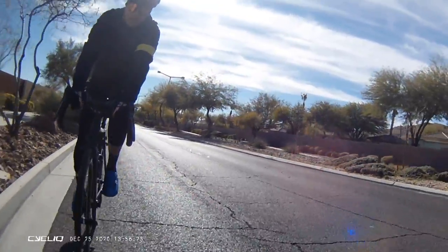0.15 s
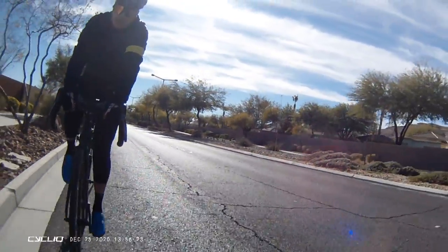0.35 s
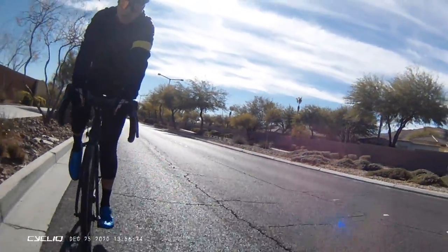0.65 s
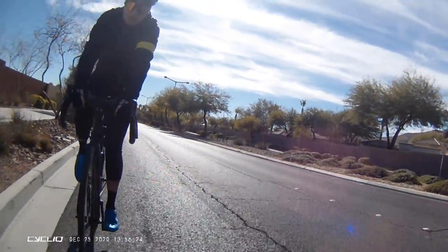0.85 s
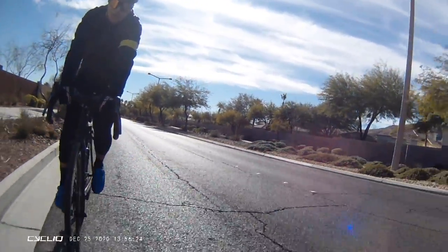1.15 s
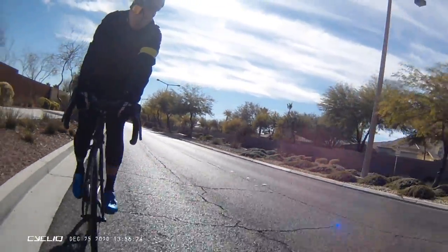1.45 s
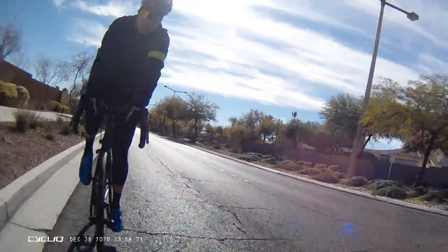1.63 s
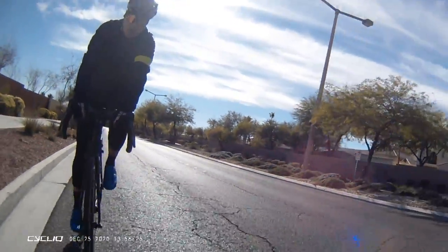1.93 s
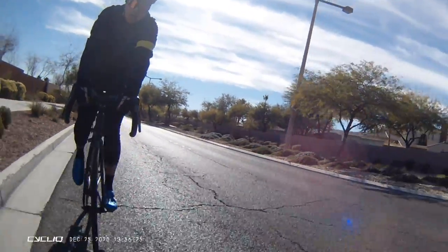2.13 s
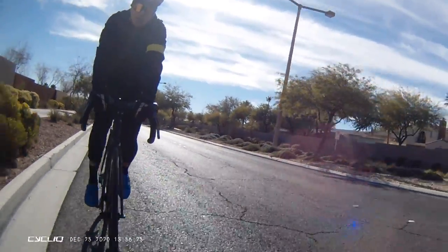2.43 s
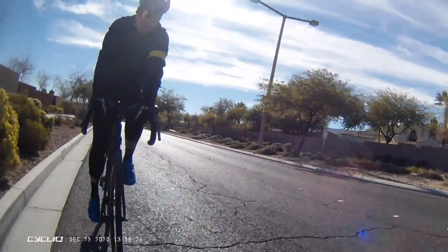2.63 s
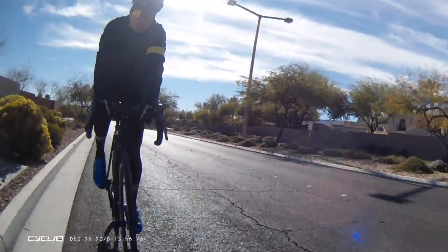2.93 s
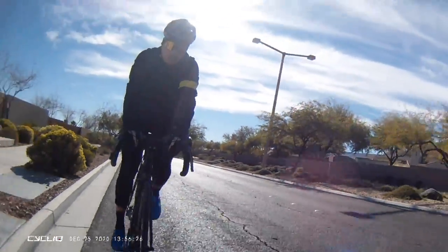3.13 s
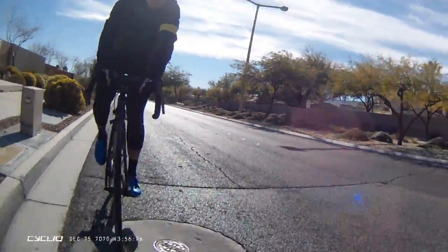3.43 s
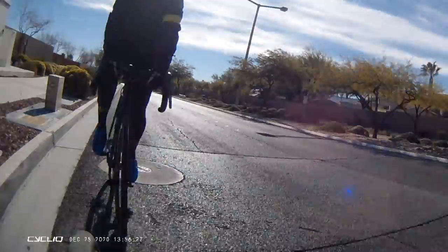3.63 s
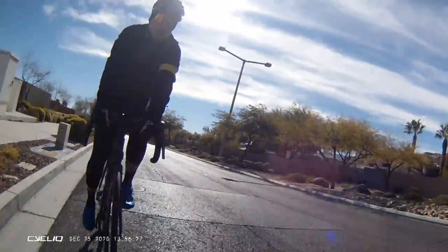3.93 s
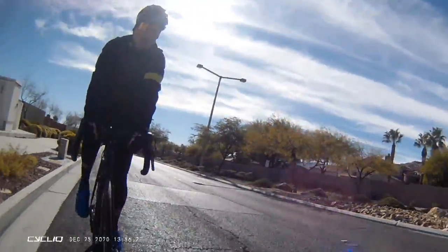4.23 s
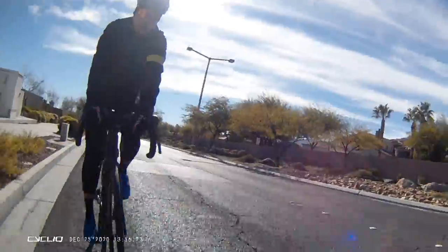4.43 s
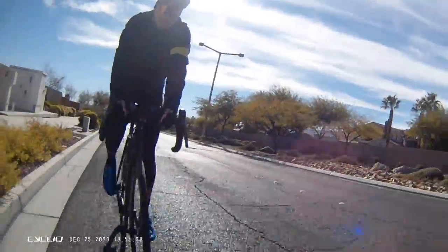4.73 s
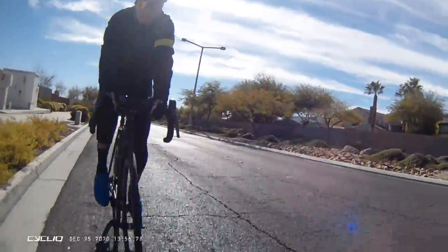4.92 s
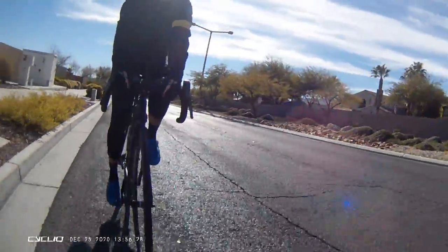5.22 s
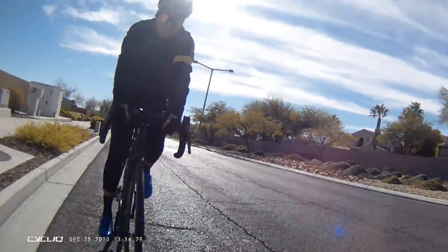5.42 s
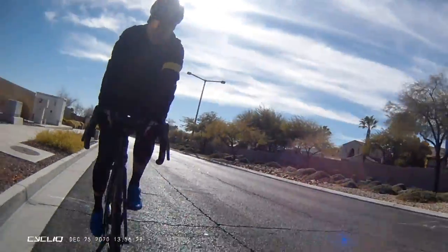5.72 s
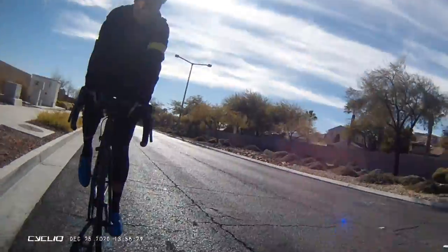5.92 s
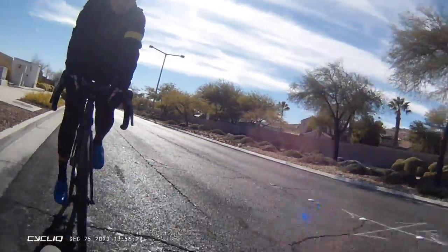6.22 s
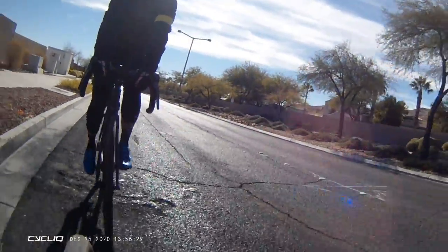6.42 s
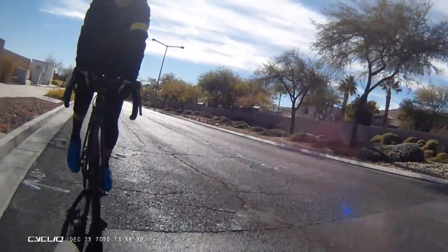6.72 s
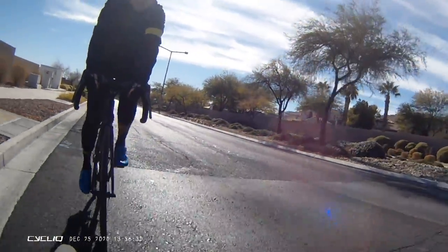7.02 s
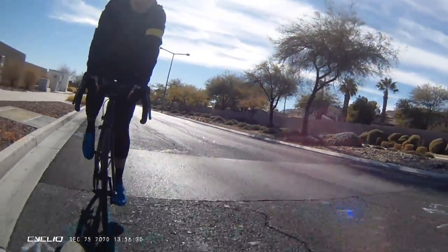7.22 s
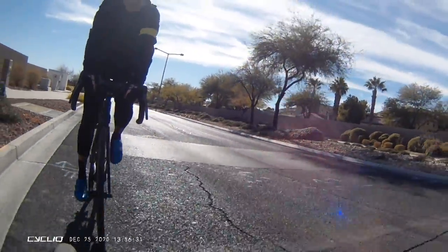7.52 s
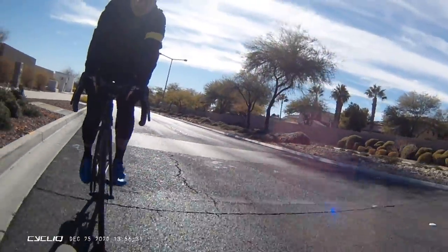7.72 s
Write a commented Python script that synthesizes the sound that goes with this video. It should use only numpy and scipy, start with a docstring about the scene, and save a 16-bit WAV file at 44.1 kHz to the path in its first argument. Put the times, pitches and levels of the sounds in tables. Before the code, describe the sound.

A bicycle rolls along cracked asphalt outdoors, heard very close from inside a plastic housing on the bike. From the start a loose part rattles against the plastic in dry, mid-bright, noisy hits, dense until 0.85 s, with a thinner gap until about 1.15 s. Uneven clusters resume and continue to 2.8 s. From 2.9 to 3.7 s hits merge into short buzzing bursts, with heavier dull clamp thumps; dense chatter carries on through 4 to 5.5 s. The roughest stretch, about 6.0 to 6.3 s, is nearly continuous rattling, followed by scattered flurries until the end near 8 s. Fine buzzing and bright tyre and wind hiss run underneath, with faint low rumble. Thin grit ticks appear near 0.6, 2.1, 2.8, 5.6, 6.4 and 6.8 s; soft narrow rubbing swells briefly, clearest near 3.2 s. Loud peaks are flattened and harsh.

```python
"""Bicycle-mounted camera on cracked asphalt

A loose part chatters against the plastic housing, in single hits and bursts: noisy touches ring its modes.
The clamp thumps as the frame bounces, its low modes struck by pushes; grit ticks are short puffs of treble.
Some pedal turns bring a narrow rubbing noise, over filtered noise for the tyre and wind.
Two microphones inside the housing overload on the loud chatter.
"""
import sys
import numpy as np
from scipy import signal
from scipy.io import wavfile
from scipy.ndimage import uniform_filter1d

SR = 44100
rng = np.random.default_rng(int(sys.argv[2]) if len(sys.argv) > 2 else 0)


def wav_record(signal):
    """Record a signal, one row per channel, as 16-bit PCM in the file named by sys.argv[1]."""
    frames = np.transpose(np.atleast_2d(signal))
    bounded = np.clip(frames, -1, 1)
    # unit amplitude maps onto the largest positive 16-bit level
    quanta = np.round(bounded * 32767).astype(np.int16)
    wavfile.write(sys.argv[1], SR, quanta)


N = 346626  # samples

# Roughness of the road, as relative strength of the light chatter: time_s, level_db
ROAD_ROUGHNESS = [(0.0, -32), (0.13, -30), (0.26, -31.5), (0.57, -31), (0.92, -37), (1.09, -37),
                  (1.75, -30), (2.1, -32.5), (2.69, -34), (3.22, -29), (3.6, -32), (3.76, -36.5),
                  (3.9, -27), (4.16, -31), (5.12, -29), (5.72, -28.5), (5.85, -35.5), (5.98, -27),
                  (6.13, -24), (6.27, -34), (6.45, -36.5), (6.98, -35), (7.2, -29), (7.66, -37.5),
                  (7.86, -37.5)]
# Single sharp hits of the loose part: start_s, level_db (relative strength)
CHATTER_HITS = [(0.05, -14.5), (0.093, -9), (0.106, -13), (0.125, -13.5), (0.148, -14.5), (0.158, -24),
                (0.181, -15), (0.194, -12.5), (0.236, -18), (0.279, -10), (0.302, -11), (0.328, -14),
                (0.344, -16), (0.36, -12.5), (0.369, -16), (0.386, -13), (0.446, -12), (0.556, -14),
                (0.568, -13.5), (0.6, -12), (0.649, -12.5), (0.685, -12.5), (0.72, -14), (0.732, -12.5),
                (0.748, -13.5), (0.838, -16), (1.162, -15.5), (1.178, -15.5), (1.191, -15.0), (1.258, -13),
                (1.328, -17), (1.391, -18), (1.41, -11), (1.43, -9), (1.546, -13), (1.571, -16),
                (1.591, -13.5), (1.648, -14.5), (1.662, -15.5), (1.678, -13), (1.692, -16), (1.749, -14.5),
                (1.782, -17), (1.815, -14), (1.843, -12.5), (1.86, -9.5), (1.883, -14.5), (1.897, -13.5),
                (1.909, -14.5), (1.918, -14.5), (1.981, -14), (1.994, -15), (2.039, -14), (2.048, -12),
                (2.106, -15), (2.117, -15), (2.131, -19), (2.28, -13), (2.301, -13), (2.326, -15.5),
                (2.34, -15), (2.377, -16), (2.397, -15.5), (2.46, -15), (2.473, -15.5), (2.509, -14.0),
                (2.522, -12.5), (2.569, -19.5), (2.621, -15), (2.655, -14.5), (2.667, -15), (2.682, -22),
                (2.712, -12.5), (2.751, -14), (2.85, -13.5), (2.881, -9), (2.893, -12.5), (2.963, -12),
                (2.979, -15), (2.999, -14.5), (3.012, -11), (3.031, -7.5), (3.268, -13), (3.301, -12.5),
                (3.404, -12), (3.415, -13.5), (3.457, -10.5), (3.468, -15), (3.48, -13.5), (3.631, -10),
                (3.689, -16.5), (3.835, -15.5), (3.847, -16), (3.908, -12), (3.918, -15), (3.979, -19),
                (3.998, -16), (4.076, -10), (4.15, -13), (4.167, -13), (4.177, -14.5), (4.218, -16),
                (4.246, -13), (4.262, -10), (4.289, -13), (4.296, -13), (4.306, -11), (4.336, -14),
                (4.351, -14.5), (4.363, -15), (4.377, -16), (4.383, -10.5), (4.403, -14), (4.427, -17),
                (4.489, -16), (4.501, -14), (4.525, -14.5), (4.541, -24), (4.548, -15.5), (4.624, -20),
                (4.685, -8), (4.701, -10.5), (4.716, -14), (4.73, -9.5), (4.836, -9.5), (4.908, -39),
                (4.922, -10), (4.954, -12), (4.976, -11), (5.007, -13.0), (5.015, -13), (5.037, -10),
                (5.045, -14.0), (5.059, -15), (5.128, -11.5), (5.309, -13.5), (5.358, -21), (5.384, -10),
                (5.391, -17), (5.418, -23), (5.43, -14), (5.492, -15), (5.518, -13), (5.543, -10),
                (5.716, -10), (5.727, -11.5), (5.768, -14.5), (5.802, -19), (5.924, -12.5), (5.943, -12.5),
                (5.96, -15), (5.994, -13.0), (6.426, -11), (6.464, -13), (6.475, -19), (6.485, -12),
                (6.53, -15), (6.555, -15.5), (6.581, -15.5), (6.592, -12.5), (6.602, -11), (6.663, -15),
                (6.678, -15.5), (6.698, -19), (6.854, -13.5), (6.966, -15.5), (6.989, -21), (7.003, -11),
                (7.022, -11), (7.041, -12), (7.064, -13.0), (7.096, -13.5), (7.107, -13.5), (7.17, -16),
                (7.195, -11), (7.24, -16), (7.304, -18.5), (7.338, -13), (7.482, -16.5), (7.508, -14.5),
                (7.518, -12), (7.53, -12.5), (7.614, -14), (7.672, -18.5), (7.683, -16.5)]
# Long bursts of chatter: start_s, level_db (relative strength), length_ms
CHATTER_BURSTS = [(2.925, -14.5, 15), (3.075, -14.5, 19), (3.11, -18.5, 15), (3.146, -13, 28.5),
                  (3.32, -13, 21.7), (3.371, -13, 26.2), (3.592, -12, 28.4), (3.646, -14.5, 19),
                  (3.667, -13, 20), (3.694, -19, 26), (3.927, -16.5, 22), (4.04, -15, 17.6),
                  (4.103, -13.5, 16.7), (4.596, -16, 18), (4.745, -14, 20.7), (5.07, -15.5, 32),
                  (5.162, -13, 38), (5.192, -13.5, 28), (5.251, -13, 24), (5.438, -14.5, 19),
                  (5.66, -13, 33.7), (6.005, -13, 19.5), (6.053, -13.5, 31), (6.095, -13, 12.3),
                  (6.123, -14.5, 20), (6.157, -13, 30), (6.189, -12, 37), (6.22, -13, 39.6),
                  (6.291, -13.5, 22), (7.21, -14.5, 17)]
# Resonances of the plastic housing: pitch_hz, width_hz, left_db, right_db,
# alike (share of the noise common to both microphones, 0-1)
HOUSING_MODES = [(657, 505, -9, -9, 0.63), (958, 34, -4.5, -8.5, 0), (1154, 254, -12, -16.5, 0.05),
                 (1555, 234, -5, -4, 0.19), (1942, 248, 0.5, -1.5, 0), (2170, 1340, -2.5, -4, 0.37),
                 (3092, 630, 2, -1, 0.59), (3740, 904, -17, -0.5, 0), (4500, 4570, -15, -11.5, 0)]
# Resonances of the clamp: pitch_hz, level_db (relative), t60_s (time to fall 60 dB)
CLAMP_MODES = [(232, -5.5, 0.051), (287, 4.5, 0.015), (428, 10, 0.0088), (713, 6.5, 0.015)]
# Hardest thumps, where the clamp bottoms out: time_s (the push starts THUMP_PUSH_S later)
HARD_THUMPS = [0.292, 0.359, 0.588, 1.847, 1.881, 2.041, 2.129, 2.978, 3.109, 3.168, 3.326, 3.545, 3.636,
               3.658, 3.843, 3.909, 3.93, 3.95, 3.978, 3.996, 4.103, 4.259, 4.278, 4.374, 4.395, 4.522,
               4.673, 4.793, 5.116, 5.155, 5.19, 5.411, 5.439, 5.516, 5.556, 5.669, 6.035, 6.148, 6.182,
               6.259, 6.475, 6.594, 7.001, 7.021, 7.328, 7.515]
# Thin bright ticks, perhaps grit on the housing: start_s, level_db (before the band-pass)
GRIT_TICKS = [(0.6374, -10), (2.0577, -10), (2.8344, -10), (5.6403, -3), (6.352, -17), (6.3826, -15),
              (6.797, -7.5)]
# Narrow hiss at some turns of the pedals, perhaps the chain rubbing: centre_s, level_db (before drift)
PEDAL_RUBS = [(0.0, -28.5), (0.82, -28.5), (2.44, -31.5), (3.199, -22), (4.83, -31), (6.37, -25.5)]
# Colour of the rubbing: pitch_hz, width_hz, level_db (relative)
RUBBING_MODES = [(3750, 900, -2), (4850, 900, 0), (8000, 6000, -9)]
# Colour of the tyre and wind hiss: pitch_hz, level_db (relative, per Hz)
HISS_COLOUR = [(1000, -19), (2000, -13), (3200, -9), (4700, 0), (6500, -9), (10000, -11), (15000, -24)]

HIT_RISE_S, HIT_FALL_S = 0.0001, 0.005      # fall time is for a hit of mean level
HIT_LONGER = 0.31                           # dB of fall time per dB of strength
SPURT_S = 0.0016                            # decay of one light spurt
REBOUND_DB, REBOUNDS_HZ = -0.5, 96.5        # unevenness inside a burst
CRACK_DB, CRACK_LOW_HZ = -23.5, 4200
PORT_LAG = 8                                # samples by which the left microphone lags
THUMP_DB, THUMP_PUSH_S = -32, 0.0022        # total push before the clamp rings; its length
TICK_LOW_HZ, TICK_S = 4500, 0.00071         # TICK_S: decay
RUB_S = 0.059                               # half length
HISS_DB, HISS_FOLLOWS = -50, 0.12           # at mean roughness, before drift; share of the road's swing
RUMBLE_DB = -56
OVERLOAD = 0.56                             # amplitude ceiling of the microphones
BASS_CUT_HZ, CUTOFF_HZ = 158, 16800

# Level trim in dB: left microphone, right microphone
SIDE_DB = np.array([[-1.5], [1.5]])


def from_db(db):
    """Gain of a level in dB."""
    return 10 ** (np.asarray(db) / 20)


def rms_one(x):
    """Scale to rms 1."""
    return x / np.sqrt(np.mean(x ** 2) + 1e-20)


def drift(rate_hz):
    """Random wander of rms 1: noise smoothed by two equal poles at rate_hz."""
    r = np.exp(-2 * np.pi * rate_hz / SR)
    noise = rng.standard_normal(N + SR)
    settled = signal.lfilter([1], [1, -2 * r, r * r], noise)[SR:]
    return rms_one(settled)


def resonance(x, hz, width_hz):
    """A two-pole peak applied twice: gain 1 on top, steep skirts."""
    r = np.exp(-np.pi * 1.55 * width_hz / SR)   # each pass is wider, as two together narrow the peak
    edge = (1 - r * r) / 2
    section = [edge, 0, -edge, 1, -2 * r * np.cos(2 * np.pi * hz / SR), r * r]
    return signal.sosfilt([section, section], x + 1e-18)


def band(x, low_hz, high_hz):
    """Gentle band-pass."""
    return signal.sosfilt(signal.butter(2, [low_hz, high_hz], "band", fs=SR, output="sos"), x)


def bounces(per_s):
    """Samples at which the frame comes down, in an uneven rhythm, and the random force of each, spread 1."""
    gaps, force = rng.standard_normal((2, 1200))
    at = np.cumsum(np.clip(1 + 0.4 * gaps, 0.3, 3)) / per_s
    inside = at < (N - 1) / SR
    return (at[inside] * SR).astype(int), force[inside]


def shaking(road_db, at, force):
    """Strength of the chatter: a fine buzz, a light spurt at each bounce, the sharp hits and long bursts."""
    buzz = from_db(road_db + 3.5 + 2.47 * drift(46))

    # a spurt swells quickly and dies within a few ms
    starts = np.zeros(N)
    starts[at] = from_db(road_db[at] + 4.5 + 2.2 * force)
    fade = np.exp(-1 / (SPURT_S * SR))
    spurts = signal.lfilter([np.e * (1 - fade)], [1, -2 * fade, fade * fade], starts + 1e-18)

    # strong hits rattle on longer
    hits = np.zeros(N)
    hit_s, hit_db = np.transpose(CHATTER_HITS)
    falls = HIT_FALL_S * from_db(HIT_LONGER * (hit_db - hit_db.mean()))
    t = np.arange(SR // 20) / SR
    rise = 1 - np.exp(-t / HIT_RISE_S)
    for start, peak, fall in zip(np.round(hit_s * SR).astype(int), from_db(hit_db), falls):
        hits[start:start + len(t)] += peak * rise * np.exp(-(t / fall) ** 2)
    strength = np.hypot(buzz + spurts, hits)

    # a long burst is a string of rebounds and replaces what lies under it
    pulsing = from_db(REBOUND_DB * drift(REBOUNDS_HZ))
    for start_s, level_db, length_ms in CHATTER_BURSTS:
        start = round(start_s * SR)
        stop = start + round(length_ms * SR / 1000)
        strength[start:stop] = from_db(level_db) * pulsing[start:stop]
    return uniform_filter1d(strength, size=8)


def chatter(strength, per_s, spread_db):
    """Each touch rings every housing mode, in part alike at both microphones, and adds a bright crack."""
    touches = (rng.random(N) < per_s / SR) * from_db(spread_db * np.minimum(rng.exponential(1, N), 4))
    touches = strength * rms_one(touches)

    rings, power = np.zeros((2, N)), 0
    for hz, width_hz, left_db, right_db, alike in HOUSING_MODES:
        shared, *own = rng.standard_normal((3, N))
        mix = np.sqrt(alike) * shared + np.sqrt(1 - alike) * np.array(own)
        spot = from_db(2.41 * drift(22.7))   # the point of contact wanders, and the colour with it
        rings += from_db([[left_db], [right_db]]) * resonance(touches * spot * mix, hz, width_hz)
        power += from_db(left_db + right_db) * np.pi * width_hz / SR   # noise power passed by the mode

    # harder touches are brighter
    hardness = np.minimum(strength / strength.mean(), 3.5) ** 1.65 * from_db(2.5 * drift(65))
    crack = band(touches * hardness * rng.standard_normal((2, N)), CRACK_LOW_HZ, 12600)
    out = rings / np.sqrt(power) + from_db(CRACK_DB + SIDE_DB) * crack
    out[0] = np.roll(out[0], PORT_LAG)
    return out


def thumps(road_db, at, force):
    """One-way knocks at bounces, hits, bursts and hard thumps ring the clamp, over a fine tyre tremble."""
    knocks = np.zeros(N)
    knocks[at] = from_db(road_db[at] - road_db.mean() - 49.5 + 7.7 * force)

    # a strong knock takes the place of light ones around it
    chance = rng.standard_normal(N)
    clear = round(0.006 * SR)
    for start_s, level_db, *_ in CHATTER_HITS + CHATTER_BURSTS:
        start = round(start_s * SR)
        knocks[start - clear:start + clear] = 0
        knocks[start] = from_db(level_db - 26.5 + 8.2 * chance[start])
    knocks = np.minimum(knocks, from_db(-41))   # these knocks top out

    # the hardest thumps are slower, heavier pushes with the knocks around them cleared
    push = np.hanning(round(THUMP_PUSH_S * SR))
    clear = 4 * len(push)
    for start in np.round((np.ravel(HARD_THUMPS) + THUMP_PUSH_S) * SR).astype(int):
        knocks[start - clear:start + clear] = 0
        knocks[start:start + len(push)] = from_db(THUMP_DB) * push / push.sum()

    tremble = from_db(0.5 * road_db - 60) * rng.standard_normal(N)
    pushes = knocks + tremble
    out = 0
    for hz, level_db, t60_s in CLAMP_MODES:
        r, w = from_db(-60 / (t60_s * SR)), 2 * np.pi * hz / SR
        luck = rng.uniform(0.29, 1.84, N)   # each mode is struck with its own strength
        blows = band(pushes * from_db(level_db) * luck, 196, 1480)   # soft contact
        out = out - signal.lfilter([0, np.sin(w)], [1, -2 * r * np.cos(w), r * r], blows)
    return from_db(6.0) * out


def ticks():
    """Each grit tick is a puff of treble noise that dies in a few ms."""
    starts = np.zeros(N)
    start_s, level_db = np.transpose(GRIT_TICKS)
    starts[np.round(start_s * SR).astype(int)] = from_db(level_db)
    puffs = signal.lfilter([1], [1, -np.exp(-1 / (TICK_S * SR))], starts + 1e-18)
    return band(puffs * rng.standard_normal((2, N)), TICK_LOW_HZ, 11000)


def rubbing():
    """Noise in two narrow resonances and a fainter broad, bright one, held for a moment at each rub."""
    t = np.arange(N) / SR
    swell = sum(from_db(level_db) * np.exp(-((t - centre_s) / RUB_S) ** 4)
                for centre_s, level_db in PEDAL_RUBS)
    noise = sum(from_db(level_db) * resonance(rng.standard_normal((2, N)), hz, width_hz)
                for hz, width_hz, level_db in RUBBING_MODES)
    return swell * from_db(1.5 * drift(27) + SIDE_DB) * rms_one(noise)


def hiss(hiss_db):
    """Bright tyre and wind noise in half-octave bands, its own at each microphone."""
    white = rng.standard_normal((2, 2, N))   # neighbouring bands take turns with two noises
    colour_hz, colour_db = np.transpose(HISS_COLOUR)
    edges = 800 * 2 ** np.arange(0, 4.6, 0.5)
    out = 0
    for k, (low, high) in enumerate(zip(edges, edges[1:])):
        level_db = np.interp(np.log(low * high) / 2, np.log(colour_hz), colour_db)
        out = out + from_db(level_db) * band(white[k % 2], low, high)
    return from_db(hiss_db + 4 * drift(3.9) + SIDE_DB) * rms_one(out)


def rumble():
    """Faint wind as low noise, partly its own at each microphone."""
    shared, *own = band(rng.standard_normal((3, N)), 44, 293)
    return from_db(RUMBLE_DB) * rms_one(1.45 * shared + np.array(own))


def scene():
    """The road drives chatter, thumps and hiss; ticks and rubbing are laid over them."""
    road_db = np.interp(np.arange(N) / SR, *np.transpose(ROAD_ROUGHNESS))
    at, force = bounces(per_s=58)
    rattle = chatter(shaking(road_db, at, force), per_s=3800, spread_db=1.9)
    tyre_and_wind = hiss(HISS_DB + HISS_FOLLOWS * (road_db - road_db.mean()))
    return rattle + thumps(road_db, at, force) + ticks() + rubbing() + tyre_and_wind


def record(dry):
    """Loud peaks flatten at the overload ceiling; bass is cut, the faint rumble added, the top cut."""
    flat = dry / (1 + np.abs(dry / OVERLOAD) ** 6) ** (1 / 6)
    bass_cut = signal.butter(3, BASS_CUT_HZ, "high", fs=SR, output="sos")
    top_cut = signal.cheby2(24, 50, CUTOFF_HZ, fs=SR, output="sos")
    return signal.sosfilt(top_cut, signal.sosfilt(bass_cut, flat) + rumble())


dry = scene()
out = record(dry)
wav_record(out)
```